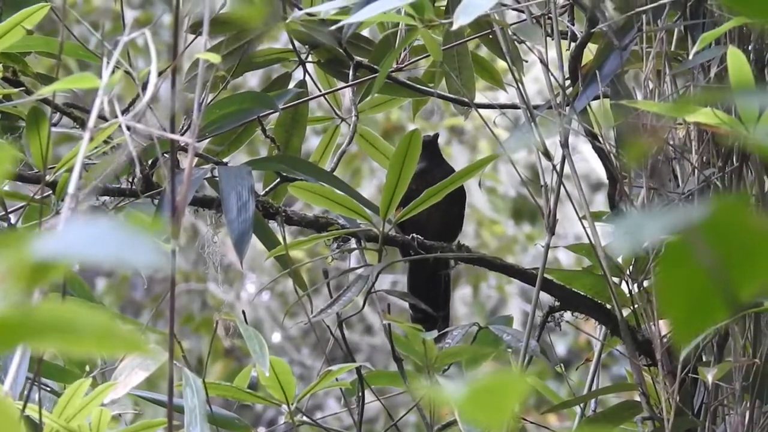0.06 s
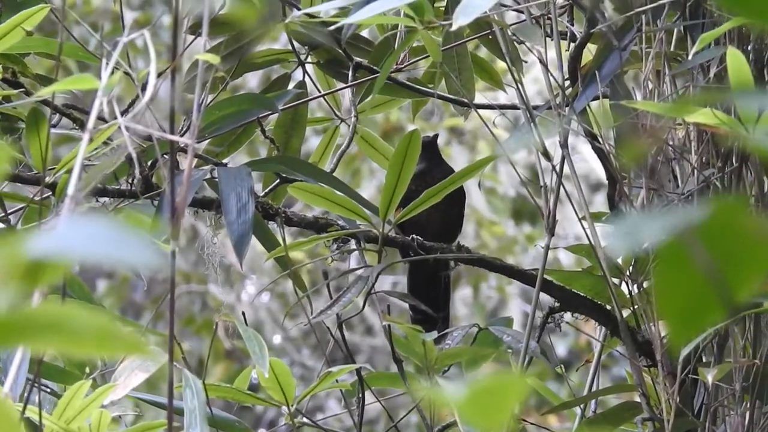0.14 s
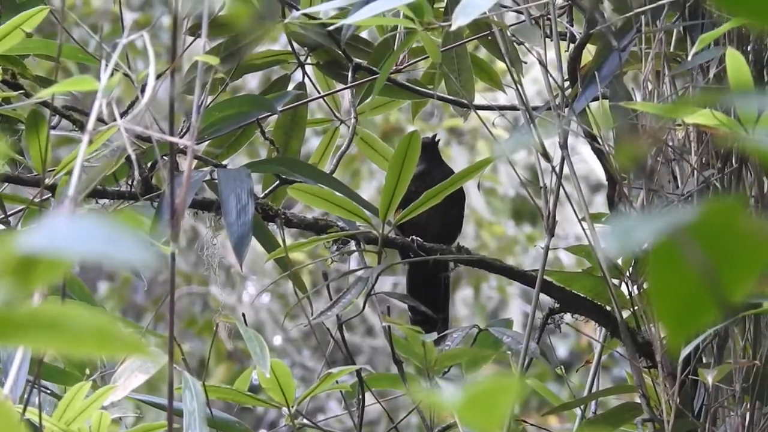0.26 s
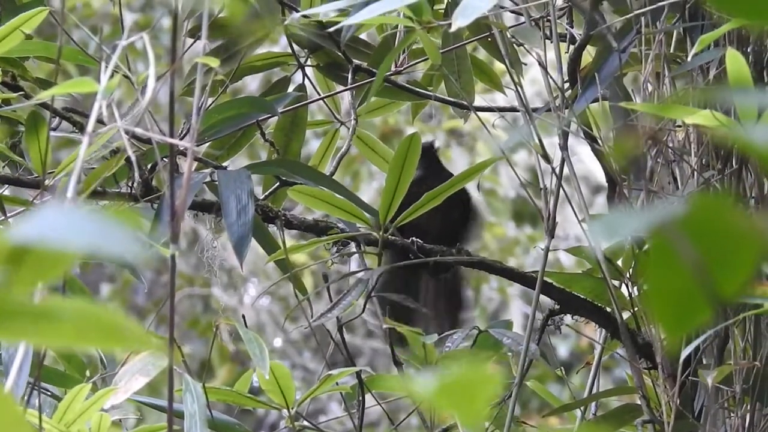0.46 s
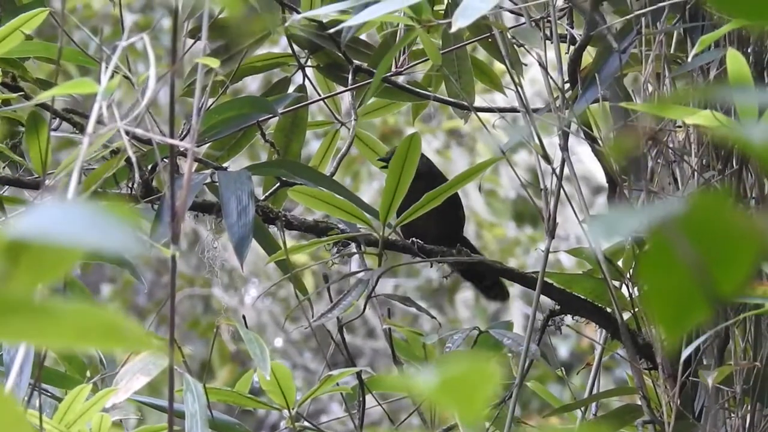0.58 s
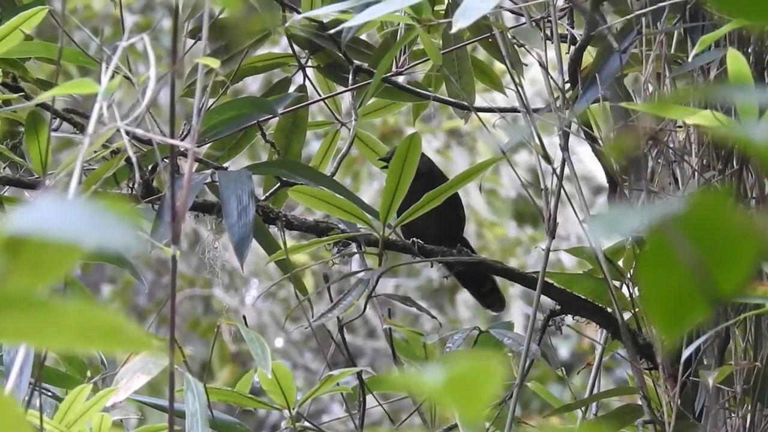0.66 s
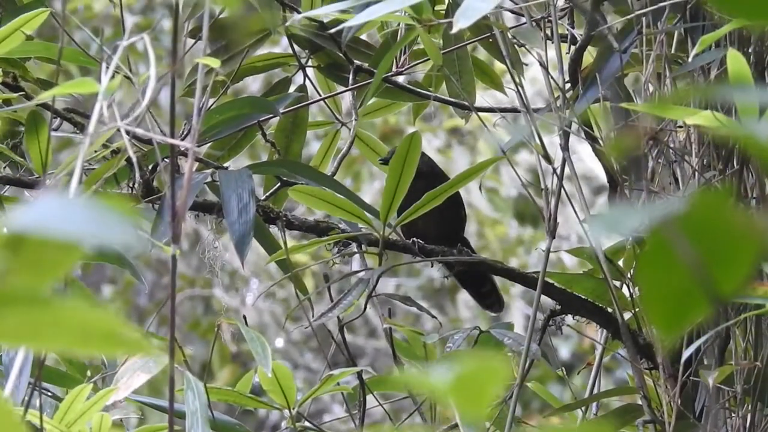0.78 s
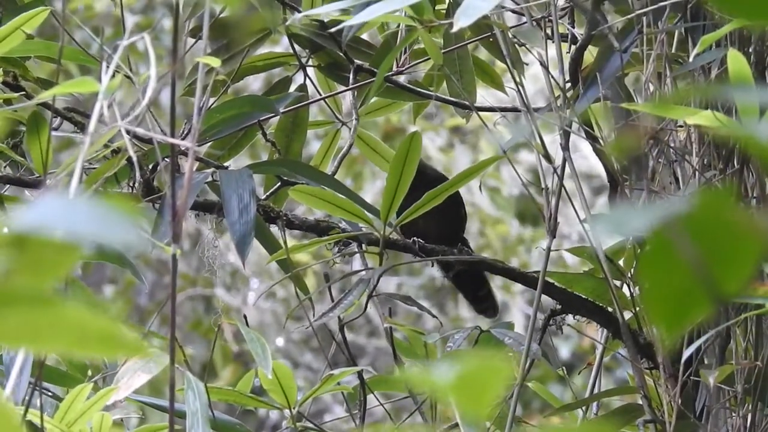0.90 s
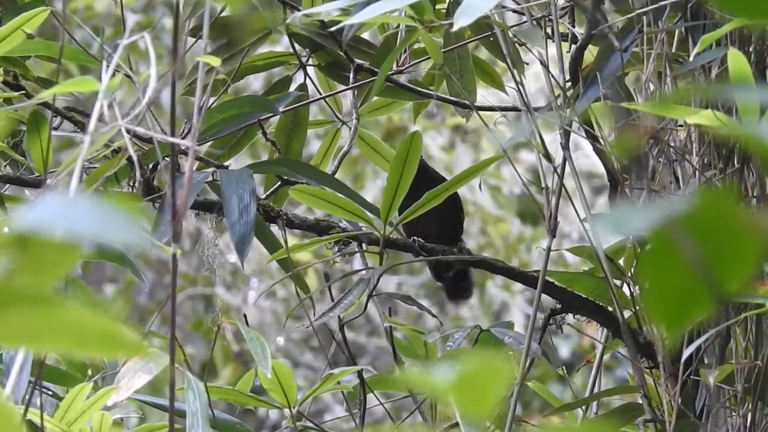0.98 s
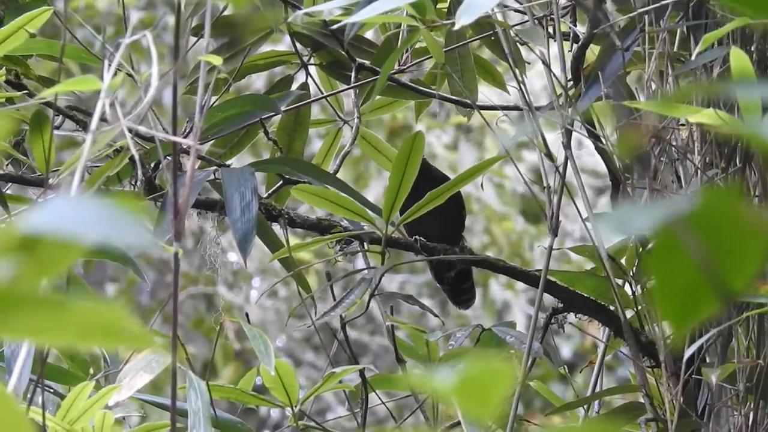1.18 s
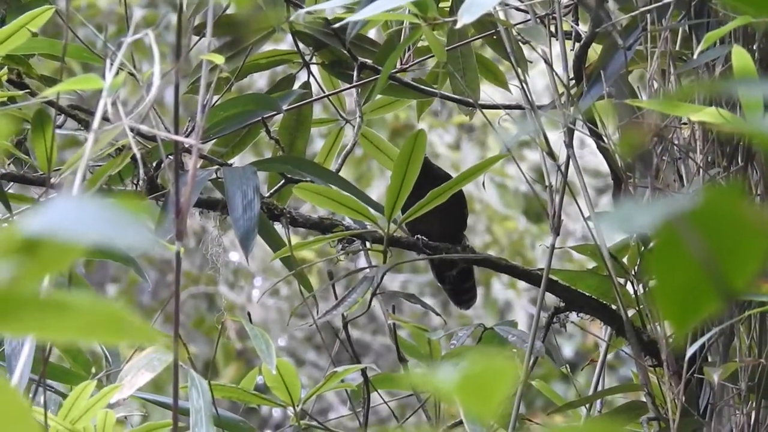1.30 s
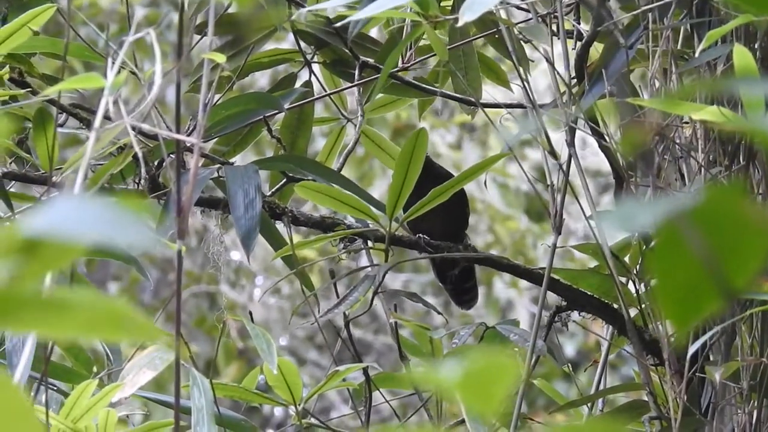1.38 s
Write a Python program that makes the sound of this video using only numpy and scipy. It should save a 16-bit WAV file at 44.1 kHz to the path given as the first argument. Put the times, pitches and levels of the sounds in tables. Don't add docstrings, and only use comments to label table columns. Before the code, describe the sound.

A bird rasps harshly, a bright gritty buzz pulsing about eighty times a second. After a faint far chirp at 0.2 s, a long call swells from 0.3 to 0.48 and breaks into pips; two short bursts follow at 0.52 and 0.57, a medium one at 0.67, a long swelling one at 0.9, a last at 1.12. Leaves scatter brief echoes over faint hiss and low distant traffic hum.

```python
import sys
import numpy as np
from scipy import signal
from scipy.fft import rfft, irfft
from scipy.io import wavfile
from scipy.ndimage import uniform_filter1d

SR = 44100
rng = np.random.default_rng(int(sys.argv[2]) if len(sys.argv) > 2 else 0)


def voltage_ratio(decibels):
    exponent = np.asarray(decibels, float) / 20
    return 10 ** exponent


def dump(signal):
    limited = np.clip(np.atleast_2d(signal).T, -1, 1)
    pcm = np.round(limited * 32767).astype(np.int16)
    wavfile.write(sys.argv[1], SR, pcm)


N = 63945
LEAD_S = .2
ATTACK_S, RELEASE_S = .0015, .0015
WOBBLE_RATE_HZ, SHIMMER_RATE_HZ = 250, 100


def at_hz(points, hz):
    table_hz, table_db = np.transpose(points)
    return np.interp(np.log(hz), np.log(table_hz), table_db)


def drift(rate_hz, size):
    r = np.exp(-2 * np.pi * rate_hz / SR)
    slow = signal.lfilter([1], [1, -2 * r, r * r], rng.standard_normal(size + 4000))[4000:]
    return slow / slow.std()


def gate(t, start_s, end_s):
    return np.clip(np.minimum((t - start_s) / ATTACK_S, (end_s - t) / RELEASE_S), 0, 1)


def warble(turns, rise, bend):
    u = turns % 1
    fall = ((1 - u) / (1 - rise)) ** bend
    return np.sin(np.pi / 2 * np.where(u < rise, u / rise, fall)) ** 2


def tone(hz, shimmer_db):
    strength = voltage_ratio(shimmer_db * drift(SHIMMER_RATE_HZ, len(hz)))
    return strength * np.sin(2 * np.pi * np.cumsum(hz) / SR)


# (first warble [s], end [s], warble period [s], slowing [share/s])
CALLS = [
    (-.150, -.020, .0130, 0),
    (.3161, .4770, .01164, .4),
    (.5166, .5590, .0130, 0),
    (.5726, .6090, .0130, 0),
    (.6716, .7605, .0130, 0),
    (.8906, 1.0455, .01304, 0),
    (1.1168, 1.2080, .0132, 0),
]
# (start level [dB], end level [dB])
EFFORT_DB = [
    (-5.5, -16.5),
    (-25.5, -7),
    (-8.5, -14),
    (-10, -9),
    (-11.5, -13),
    (-23, -10),
    (-16, -11.5),
]
SETTLE_S, SWELL_POWER, TIMING_JITTER = .018, .7, .014
UPPER_ENTERS, LOWER_ENTERS, LOWER_STOPS_EARLY = .74, -.1, .7
LOWER_SWELL_SHARE = .74


def breath(t):
    turns, settle, surge, upper, lower = np.zeros((5, len(t)))
    for (start, end, period, slowing), (first_db, last_db) in zip(CALLS, EFFORT_DB):
        age = t - start
        on = (age > -period) & (t < end)
        turns[on] = (age * (1 - slowing * age) / period)[on]
        settle[on] = np.exp(-np.maximum(age - period, 0) / SETTLE_S)[on]
        surge[on] = (settle * np.clip(2 * age / period - 1, 0, 1))[on]
        progress = np.clip((age - period) / (end - start - period), 0, 1)
        swell_db = (last_db - first_db) * (1 - progress ** SWELL_POWER)
        upper_gate = gate(t, start + UPPER_ENTERS * period, end)
        lower_gate = gate(t, start + LOWER_ENTERS * period, end - LOWER_STOPS_EARLY * period)
        upper += voltage_ratio(last_db - swell_db) * upper_gate
        lower += voltage_ratio(last_db - LOWER_SWELL_SHARE * swell_db) * lower_gate
    return turns + TIMING_JITTER * drift(40, len(t)), settle, surge, upper, lower


# (frequency [Hz], level [dB])
BEAK_DB = [(1900, -40), (2500, -25.5), (3200, -15.5), (4000, -15), (4700, -13.5), (5200, -5.5),
           (5850, -1.72), (6800, -9)]
BEAK_TOP = (10060, -33.5)  # (Hz, dB)
WOBBLE_HZ, SHIMMER_DB = 100, 1.2


def voiced(hz, gain_db):
    return voltage_ratio(gain_db + at_hz(BEAK_DB + [BEAK_TOP], hz)) * tone(hz, SHIMMER_DB)


UPPER_LOW_HZ, UPPER_HIGH_HZ, UPPER_START_HZ = 4350, 9500, 950
UPPER_RISE, UPPER_FALL_BEND, UPPER_OCTAVE_DB = .43, 1.12, -47


def upper_voice(turns, settle, level):
    low = UPPER_LOW_HZ + UPPER_START_HZ * settle
    hz = low + (UPPER_HIGH_HZ - low) * warble(turns, UPPER_RISE, UPPER_FALL_BEND)
    hz = hz + WOBBLE_HZ * drift(WOBBLE_RATE_HZ, len(hz))
    beak = voltage_ratio(at_hz(BEAK_DB + [BEAK_TOP], hz))
    octave = voltage_ratio(UPPER_OCTAVE_DB) * tone(2 * hz, SHIMMER_DB)
    return level * beak * (tone(hz, SHIMMER_DB) + octave)


LOWER_LOW_HZ, LOWER_HIGH_HZ, LOWER_START_HZ = 2250, 4500, 850
LOWER_RISE, LOWER_FALL_BEND, LOWER_LAG = .33, .8, .145
LOWER_DB, OCTAVE_DB = 1.5, -11


def lower_voice(turns, surge, level):
    swing = LOWER_HIGH_HZ + LOWER_START_HZ * surge - LOWER_LOW_HZ
    hz = LOWER_LOW_HZ + swing * warble(turns - LOWER_LAG, LOWER_RISE, LOWER_FALL_BEND)
    hz = hz + WOBBLE_HZ / 2 * drift(WOBBLE_RATE_HZ, len(hz))
    octave = (turns > UPPER_ENTERS) * voiced(2 * hz, OCTAVE_DB)
    return level * (voiced(hz, LOWER_DB) + octave)


# (time [s], level [dB])
PIPS = [
    (0.48, -17.5),
    (0.4839, -12),
    (.4888, -16),
    (0.4957, -30),
    (0.7635, -20.5),
    (0.7664, -20.5),
]
PIP_HZ, PIP_S = 5900, .0007


def stutter(t):
    puffs = sum(voltage_ratio(db) * np.exp(-((t - s) / PIP_S) ** 2 / 2) for s, db in PIPS)
    return puffs * np.sin(2 * np.pi * PIP_HZ * t)


def near_bird(t):
    turns, settle, surge, upper, lower = breath(t)
    return upper_voice(turns, settle, upper) + lower_voice(turns, surge, lower) + stutter(t)


# (time [s], length [s], from [Hz], to [Hz], level [dB])
FAR_SLURS = [
    (.188, 0.01, 3000, 2440, -40.5),
    (0.196, 0.013, 4200, 4700, -41),
    (0.197, 0.0075, 7040, 6300, -40),
    (0.202, 0.0048, 5910, 5800, -26.5),
    (0.216, .018, 6140, 7140, -24.5),
    (0.224, 0.0078, 4500, 4280, -33),
    (0.218, 0.014, 7600, 8510, -36),
    (0.887, 0.0062, 5750, 6820, -29),
]
FAR_WOBBLE_HZ, FAR_SHIMMER_DB = 350, 4


def far_bird(t):
    out = np.zeros(len(t))
    for start, length, from_hz, to_hz, db in FAR_SLURS:
        rough = 1 if start < .5 else .15
        hz = np.interp(t, [start, start + length], [from_hz, to_hz])
        hz = hz + rough * FAR_WOBBLE_HZ * drift(WOBBLE_RATE_HZ, len(t))
        out += voltage_ratio(db) * gate(t, start, start + length) * tone(hz, rough * FAR_SHIMMER_DB)
    return out


# (frequency [Hz], level [dB])
DIRECT_DB = [(2000, -2), (2600, 2), (3300, 2), (4000, -14), (4600, -9), (5900, 3), (7000, -9), (9500, -6)]
FAR_DIRECT_DB, PAN_DB = -3, .9


def straight_path(near, far):
    hz = np.arange(1, len(near) // 2 + 2) * SR / len(near)
    beamed = irfft(rfft(near) * voltage_ratio(at_hz(DIRECT_DB, hz)), len(near))
    return (beamed + voltage_ratio(FAR_DIRECT_DB) * far) * voltage_ratio(np.array([[PAN_DB], [-PAN_DB]]))


NEAR_T60_S, NEAR_DB, DEEP_T60_S, DEEP_DB = .12, -6, .74, -9
FIRST_ECHO_S, SCATTER_LIKENESS = .0024, .55
SCATTER_ABOVE_HZ, FAR_WET_DB = 870, 4


def foliage(near, far):
    high_pass = signal.butter(1, SCATTER_ABOVE_HZ, "high", fs=SR)
    x = signal.lfilter(*high_pass, near + voltage_ratio(FAR_WET_DB) * far)
    age = np.arange(SR) / SR
    mid, side = rng.standard_normal((2, SR))
    decay = 0
    for db, t60 in ((NEAR_DB, NEAR_T60_S), (DEEP_DB, DEEP_T60_S)):
        unit_energy = np.sqrt(2 * np.log(1000) / t60 / SR)
        decay = decay + voltage_ratio(db - 60 * age / t60) * unit_energy
    shared = np.sqrt((1 + SCATTER_LIKENESS) / 2) * mid
    apart = np.sqrt((1 - SCATTER_LIKENESS) / 2) * side * [[1], [-1]]
    echo = decay * (age > FIRST_ECHO_S) * (shared + apart)
    return signal.fftconvolve(x[None], echo, axes=1)[:, :len(x)]


# (frequency [Hz], level [dB])
AIR_SPECTRUM_DB = [(25, -36.5), (60, -13.5), (140, -3.5), (260, -11.5), (1700, -21.5), (5500, -19.5),
                   (9300, -33), (10000, -38)]
# (frequency [Hz], likeness [0-1])
AIR_LIKENESS = [(60, 0.7), (320, 0.46), (1690, 0.82), (8940, 0.16)]
AIR_TOP = (15600, -41.5)  # (Hz, dB)
AIR_DB = -47.5


def air():
    hz = np.arange(1, N // 2 + 2) * SR / N
    alike = at_hz(AIR_LIKENESS, hz)
    mid, side = rfft(rng.standard_normal((2, N)))
    both = np.sqrt(1 + alike) * mid + np.sqrt(1 - alike) * side * [[1], [-1]]
    out = irfft(voltage_ratio(at_hz(AIR_SPECTRUM_DB + [AIR_TOP], hz)) * both, N)
    return voltage_ratio(AIR_DB) * out / out.mean(0).std()


def scene():
    lead = int(LEAD_S * SR)
    t = (np.arange(N + lead) - lead) / SR
    near, far = near_bird(t), far_bird(t)
    birds = straight_path(near, far) + foliage(near, far)
    return birds[:, lead:] + air()


DUCK_DB, DUCK_FROM_DB, DUCK_SLOPE, DUCK_SMOOTH_S = 6.5, -39.5, 1, .03
DUCK_LOW_HZ, DUCK_HIGH_HZ = 191, 2100


def noise_suppression(x):
    width = int(DUCK_SMOOTH_S * SR)
    level_db = 10 * np.log10(uniform_filter1d(x.mean(0) ** 2, width) + 1e-12)
    dip_db = np.clip(DUCK_SLOPE * (level_db - DUCK_FROM_DB), 0, DUCK_DB)
    dip = voltage_ratio(-uniform_filter1d(dip_db, width))
    band = signal.butter(2, [DUCK_LOW_HZ, DUCK_HIGH_HZ], "band", fs=SR, output="sos")
    return x - (1 - dip) * signal.sosfiltfilt(band, x)


def roll_off(x):
    return signal.sosfilt(signal.butter(12, 15650, fs=SR, output="sos"), x)


def record(dry):
    mix = noise_suppression(dry)
    return roll_off(mix)


dry = scene()
out = record(dry)
dump(out)
```